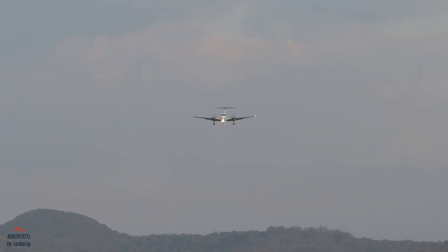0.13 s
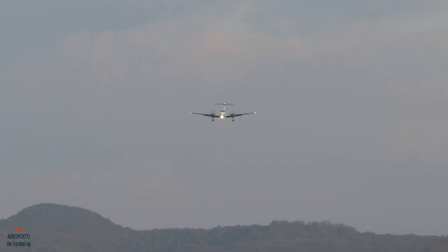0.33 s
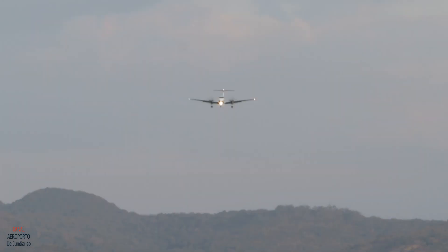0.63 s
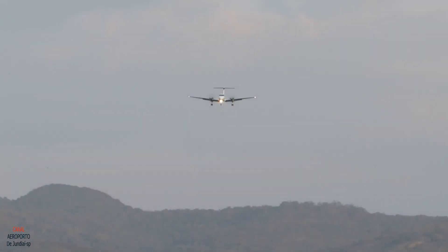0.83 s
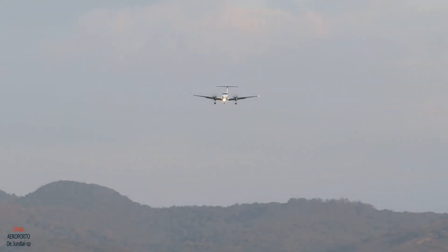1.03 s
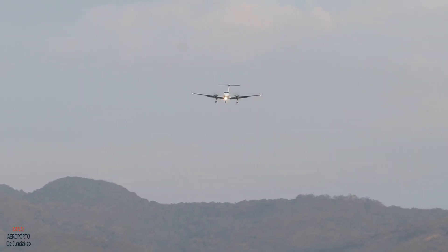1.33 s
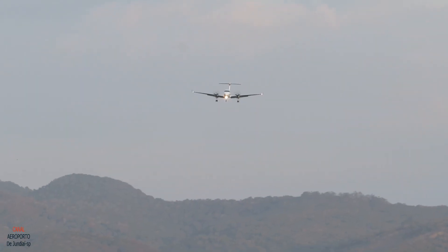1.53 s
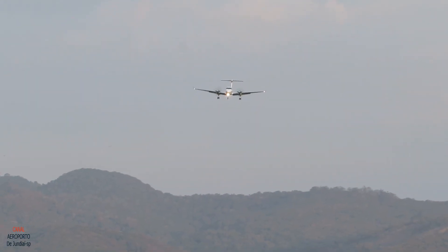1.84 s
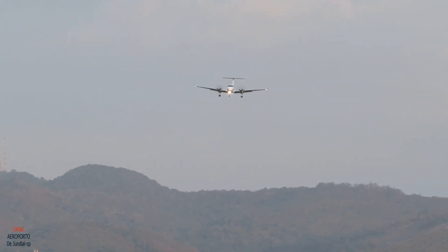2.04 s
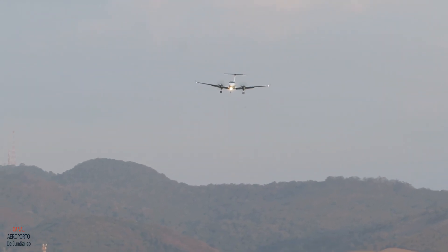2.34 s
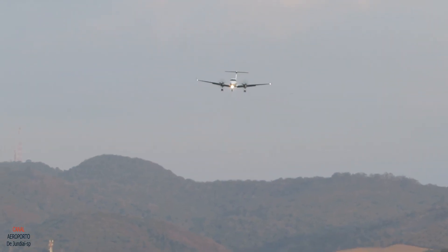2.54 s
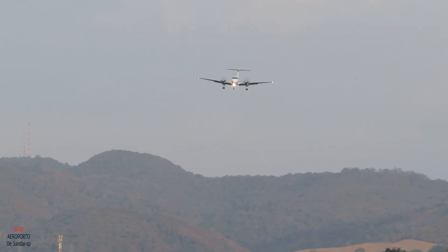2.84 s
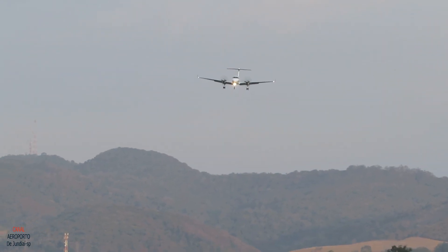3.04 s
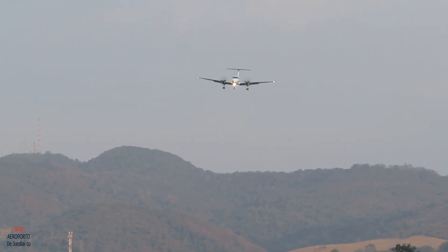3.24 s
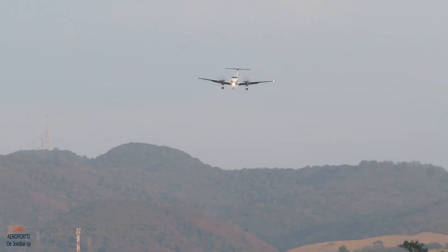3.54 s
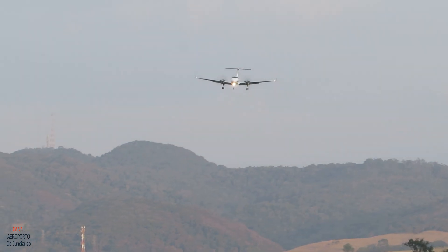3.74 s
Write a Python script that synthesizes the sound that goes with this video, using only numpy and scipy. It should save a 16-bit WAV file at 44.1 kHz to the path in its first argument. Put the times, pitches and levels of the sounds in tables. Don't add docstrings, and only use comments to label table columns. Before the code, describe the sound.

After a tiny silence, a twin turboprop's roar cuts in at about 0.06 s, low, muffled and hollow from ground reflection. It steps up near 1 s and stays continuous to the abrupt end. Low propeller hum and uneven exhaust throbs sit beneath; a steady-pitched turbine whine flutters, strongest around 1.5-2.3 s and leaning left. Faint hiss rises until 1.5 s. Faint bird chirps come at 0.3 and 2.9 s.

```python
import sys
import numpy as np
from scipy import signal
from scipy.fft import rfft, irfft, next_fast_len
from scipy.io import wavfile

SR = 44100
rng = np.random.default_rng(int(sys.argv[2]) if len(sys.argv) > 2 else 0)


def volts_from_db(level):
    exponent = np.asarray(level, float) / 20
    return 10 ** exponent


def to_wav(s):
    ch = np.atleast_2d(s).T
    pcm = np.round(np.clip(ch, -1, 1) * 32767)
    wavfile.write(sys.argv[1], SR, pcm.astype(np.int16))


N = 171549
T = np.arange(N) / SR
FFT_SIZE = 2 * next_fast_len(N // 2 + 1)
FFT_HZ = np.arange(FFT_SIZE // 2 + 1) * SR / FFT_SIZE
SIDES = np.array([[1], [-1]])
START_S = .058


def in_time(rows):
    s, *cols = np.transpose(rows)
    return [np.interp(T, s, c) for c in cols]


def at_hz(points, hz):
    table_hz, value = np.transpose(points)
    return np.interp(np.log(hz + 1), np.log(table_hz), value)


def rms_one(x):
    return x / np.sqrt(np.mean(x ** 2) + 1e-20)


def drift(rate_hz):
    r = np.exp(-80 * np.pi * rate_hz / SR)
    slow = signal.lfilter([1], [1, -2 * r, r * r], rng.standard_normal(N // 40 + 2002))
    slow = rms_one(slow[2000:])
    return np.interp(np.arange(N) / 40, np.arange(len(slow)), slow)


def narrow_noise(hz, width_hz):
    r = np.exp(-np.pi * width_hz / SR)
    x = rng.standard_normal(N + SR)
    for _ in range(2):
        x = signal.lfilter([1, 0, -1], [1, -2 * r * np.cos(2 * np.pi * hz / SR), r * r], x)
    return rms_one(x[SR:])


def swells(rows):
    s, half_s, *dbs = np.transpose(rows)[:, :, None]
    coarse_s = T[::50]
    shape = np.exp(-2 * np.abs((coarse_s - s) / (1.44 * half_s)) ** 4.5)
    levels = [np.sqrt(np.sum(volts_from_db(2 * db) * shape, axis=0)) for db in dbs]
    return np.array([np.interp(T, coarse_s, level) for level in levels])


def patchy(spectra, low_hz, high_hz, patchy_db, count, tilt_db=0):
    octaves = np.log(np.clip(FFT_HZ, low_hz, high_hz) / low_hz)
    place = octaves / np.log(high_hz / low_hz) * (count - 1)
    out, together = 0, drift(14.0)
    for k, hz in enumerate(np.geomspace(low_hz, high_hz, count)):
        share = np.clip(1 - np.abs(place - k), 0, 1)
        flicker = 0.6 * together + 0.81 * drift(1.8) + 0.79 * drift(24.0)
        db = patchy_db * flicker + tilt_db * np.abs(np.log2(max(hz, 120) / 300))
        out = out + volts_from_db(db) * irfft(spectra * share, FFT_SIZE)[:, :N]
    return rms_one(out)


# time in s, level in dB, lift in dB per octave either side of 300 Hz.
ROAR_LEVEL = [(.06, -33, 0.47), (.5, -33, 1), (1.0, -28.5, -0.2), (1.5, -28.5, 1), (2.0, -28, 0.5),
              (2.6, -28, 1.22), (3.3, -27, 1), (3.65, -29, 1.7), (3.8, -25.5, 0.2), (3.89, -30, 3)]
# frequency in Hz, density in dB per Hz.
ROAR_COLOUR = [(22, -19.5), (50, -9.5), (110, -15.5), (330, -2.5), (560, -16), (1000, -23.5), (1600, -29.5),
               (4000, -50.5)]
# frequency in Hz, coherence 0-1.
LIKENESS = [(30, .999), (160, .98), (300, .99), (450, .88), (700, .62), (2000, .8), (3200, .45)]
# frequency in Hz, phase in rad.
LEAD = [(40, -0.23), (200, -0.35), (430, -0.78), (1290, -0.42), (2240, -0.16)]
# frequency in Hz, difference in dB.
TILT = [(60, 0), (160, 1.5), (270, -.3), (440, -1), (730, .5), (2000, 0)]


def roar():
    ground_delay_s, ground_gain, ground_cut_hz = 0.00097, 0.42, 1700
    bank_delay_s, bank_gain, bank_cut_hz = 0.0013, 0.23, 700
    hz = FFT_HZ
    ground = ground_gain / (1 + (hz / ground_cut_hz) ** 2) * np.exp(-2j * np.pi * hz * ground_delay_s)
    bank = bank_gain / (1 + (hz / bank_cut_hz) ** 2) * np.exp(-2j * np.pi * hz * bank_delay_s)
    mid, side = rfft(rng.standard_normal((2, FFT_SIZE)))
    alike = np.clip(at_hz(LIKENESS, hz), 0, 1)
    pair = np.sqrt(1 + alike) * mid + SIDES * np.sqrt(1 - alike) * side
    pair = pair * np.exp(.5j * SIDES * at_hz(LEAD, hz))
    pair = pair * volts_from_db(at_hz(ROAR_COLOUR, hz) + .5 * SIDES * at_hz(TILT, hz))
    pair = pair * (1 + ground - bank) / (1 + (hz / 5000) ** 6)
    level_db, tilt_db = in_time(ROAR_LEVEL)
    return volts_from_db(level_db) * patchy(pair, 60, 1930, patchy_db=0.6, count=12, tilt_db=tilt_db)


# frequency in Hz, width in Hz, level in dB against the roar.
DUCTS = [(327, 34.7, -11), (930, 210, -18.5), (254.3, 43, -13), (1903, 680, -27.5), (409.8, 30, -15.5)]
# time in s, then one level in dB per duct.
DUCT_SWELL = [(.06, 3.5, -10, -1, -3, -11), (.6, -14, 0, -9, -2, 3), (.9, -6.5, -8, -4, 0.5, -6),
              (1.2, 7.5, -1.5, -2, -1, 0.5), (1.7, 5, 1, -6, 0, -1.5), (2.1, -0.5, 1.5, -9, 1, 2.5),
              (2.4, 1.5, 0, -9, 3, 0), (2.7, 3, 4, 4.5, -1, -3), (3.0, -5, -2, 0, 2, 3),
              (3.3, -3, 4, 0, 3, 0.5), (3.55, -3, 2.5, 5, 5, -0.5), (3.89, 6, -1, -3.5, 5.5, 1.5)]


def ducts():
    out = 0
    for (hz, width_hz, db), swell_db in zip(DUCTS, in_time(DUCT_SWELL)):
        mid, side = narrow_noise(hz, width_hz), narrow_noise(hz, width_hz)
        out = out + volts_from_db(db + swell_db + 2.8 * drift(1.7)) * (mid + 0.073 * SIDES * side)
    return volts_from_db(in_time(ROAR_LEVEL)[0]) * out


# time in s, level in dB.
BLADES = [(.06, -47), (.2, -50), (.4, -37.5), (.75, -36), (1.0, -40), (1.4, -42.5), (1.55, -63), (1.7, -40),
          (1.8, -46.5), (2.1, -39.5), (2.45, -35.5), (2.75, -33.5), (3.05, -34), (3.5, -33.5),
          (3.89, -35.5)]


def blade_hum():
    start_hz, sag_hz_per_s, lag_rad = 128.8, .95, 0.11
    second_db, flutter_db, pan_db = -10.5, 1.2, 2
    phase = 2 * np.pi * np.cumsum(start_hz - sag_hz_per_s * T) / SR + 0.58 * drift(4.0)
    tone = np.sin(phase + .5 * SIDES * lag_rad) + volts_from_db(second_db) * np.sin(2 * phase)
    level_db = in_time(BLADES)[0] + flutter_db * drift(8.7) + .5 * SIDES * pan_db
    return np.sqrt(2) * volts_from_db(level_db) * tone


# centre in s, half length in s, level in dB.
THROB = [(.2, 0.036, -33), (.75, 0.55, -36.5), (1.35, 0.24, -34.5), (1.55, 0.076, -35),
         (1.93, 0.054, -30.5), (2.2, 0.13, -34.5), (2.55, 0.11, -33.5), (2.93, 0.06, -31.5),
         (3.3, 0.085, -33.5), (3.6, 0.1, -32), (3.85, 0.059, -34.5)]
# time in s, level in dB.
THROB_TONE = [(.06, -9), (1.9, -9), (2.3, 1), (3.89, 1)]


def exhaust_throb():
    throb_hz, width_hz, wander_hz, noise_db = 70, 30, 1.0, -5
    phase = 2 * np.pi * np.cumsum(throb_hz + wander_hz * drift(2.8)) / SR
    tone = np.sqrt(2) * volts_from_db(in_time(THROB_TONE)[0]) * np.sin(phase)
    return swells(THROB)[0] * (tone + volts_from_db(noise_db) * narrow_noise(throb_hz, width_hz))


# time in s, level in dB.
GAIN = [(.06, -70), (.5, -68), (1.0, -66), (1.45, -64), (3.89, -64.5)]
# frequency in Hz, density in dB per Hz.
HISS_COLOUR = [(500, -11.5), (3000, -0.5), (4500, -3.5), (7500, -2.5), (8300, -6.5), (11500, -10),
               (13800, -18), (15000, -22)]


def hiss():
    pair = rfft(rng.standard_normal((2, FFT_SIZE))) * volts_from_db(at_hz(HISS_COLOUR, FFT_HZ))
    return volts_from_db(in_time(GAIN)[0] + 8) * patchy(pair, 2700, 12000, patchy_db=0.5, count=4)


def pilot_line():
    line_hz, level_db = 13169, -22
    phase = 2 * np.pi * line_hz * T + np.array([[0], [1]])
    return volts_from_db(in_time(GAIN)[0] + level_db) * np.sin(phase)


# centre in s, half length in s, left and right level in dB.
WHINE = [(0.162, 0.15, -42, -45), (0.38, 0.053, -37, -45), (0.524, 0.045, -34.5, -39.5),
         (0.626, 0.027, -39.5, -50), (0.735, 0.05, -38, -43), (0.93, 0.13, -34, -47),
         (1.025, 0.05, -37, -42), (1.095, .025, -42, -42), (1.197, .03, -36, -45),
         (1.325, 0.086, -33.5, -39.5), (1.5, 0.076, -29, -44), (1.655, 0.062, -25.5, -34),
         (1.747, .025, -34, -42), (1.81, 0.035, -40, -42), (1.918, 0.051, -28.5, -36.5),
         (2.042, 0.053, -32.5, -35.5), (2.188, 0.06, -27.5, -32.5), (2.292, .04, -32, -38),
         (2.38, 0.038, -33.5, -43), (2.46, 0.031, -45, -42), (2.571, 0.041, -32.5, -41),
         (2.673, 0.12, -37, -41.5), (2.804, 0.031, -33, -53), (2.917, 0.04, -40, -42.5),
         (3.069, 0.076, -32.5, -35.5), (3.245, 0.032, -29.5, -42), (3.355, 0.068, -37.5, -48),
         (3.484, 0.04, -29, -37), (3.586, 0.049, -32, -32.5), (3.688, 0.033, -40, -37.5),
         (3.8, 0.076, -38, -42.5)]
# centre in s, half length in s, left and right level in dB.
OVERTONE = [(.09, 0.055, -57, -69), (.645, 0.13, -53, -68), (0.974, .035, -64, -62),
            (1.185, 0.065, -59, -70), (1.404, .09, -65, -54.5), (1.648, 0.088, -59.5, -59),
            (1.897, 0.041, -55.5, -67), (1.98, 0.036, -65, -63), (2.144, .06, -57.5, -65),
            (2.35, 0.028, -58, -62), (2.7, 0.13, -51.5, -60), (2.95, .04, -61, -64), (3.1, .03, -56, -63),
            (3.34, 0.076, -53, -60), (3.42, 0.045, -60, -59), (3.65, .05, -57, -61), (3.78, .07, -77, -60)]
# multiple of the whine, level in dB against the overtone.
UPPER = [(3, -17), (4, -24)]
# centre in s, half length in s, left and right depth in dB.
NULLS = [(0.106, 0.014, 13, 5), (.28, .015, 2, 8), (0.452, .015, -2, 1), (.796, 0.016, 8, 8),
         (1.07, 0.014, 16, 0), (1.135, 0.018, 23, 13), (1.22, .012, 5, 17), (1.48, .012, -0.5, 13),
         (1.805, 0.014, 14, 15), (1.906, 0.019, 6, 8), (2.074, .01, 7, 3), (2.442, .009, 17, 11),
         (2.488, .008, 10, 11), (2.512, .012, 16, 16), (2.845, .01, 7, 18), (2.887, .01, 18, -3),
         (3.184, .013, -3, 10), (3.267, 0.012, 1, 14), (3.536, 0.0089, 4, 1)]


def whine():
    whine_hz, wander_rad, flutter_db = 1304.8, .4, .7
    skirt_hz, skirt_db = 50, -20
    shared = wander_rad * drift(4.8)
    nulls = sum(np.outer(dbs, np.exp(-((T - s) / half_s) ** 2)) for s, half_s, *dbs in NULLS)
    out = []
    for sign, level, over, null_db in zip((.5, -.5), swells(WHINE), swells(OVERTONE), nulls):
        steady = 2 * np.pi * whine_hz * T + shared
        phase = steady + wander_rad * drift(1.4) + sign * 0.6
        main = np.sqrt(2) * np.sin(phase) + volts_from_db(skirt_db) * narrow_noise(whine_hz, skirt_hz)
        main = level * volts_from_db(flutter_db * drift(22.0) - null_db) * main
        steady = steady + sign * .5
        upper = np.sin(2 * steady) + sum(volts_from_db(db) * np.sin(k * steady) for k, db in UPPER)
        out.append(main + np.sqrt(2) * over * upper)
    return np.array(out)


# peak in s, rise in s, top in Hz, fall in Hz per s, level in dB.
CHIRPS = [
    (.32, .045, 7350, 14000, -66.5),
    (2.935, .008, 7600, 20000, -60.5),
]
# delay in s, level in dB.
CHIRP_ECHOES = [(.013, -7), (.027, -8), (.043, -8), (.07, -10), (.11, -13)]


def bird():
    climb_hz_per_s, fall_s, edge_s = 11000, .13, .008
    fade_db, pan_db, flutter_db = 7, -5, 4
    out = np.zeros(N)
    for s, rise_s, top_hz, fall_hz_per_s, db in CHIRPS:
        t = np.clip(T - s, -rise_s, fall_s)
        hz = top_hz + np.where(t < 0, climb_hz_per_s * t, -fall_hz_per_s * t)
        edge = np.clip(np.minimum(t + rise_s, fall_s - t) / edge_s, 0, 1)
        level_db = db - fade_db * np.abs(t) / fall_s + flutter_db * drift(45.0)
        out += edge * volts_from_db(level_db) * np.sin(2 * np.pi * np.cumsum(hz) / SR)
    out = out + sum(volts_from_db(db) * np.roll(out, int(s * SR)) for s, db in CHIRP_ECHOES)
    return out * volts_from_db(.5 * SIDES * pan_db)


def scene():
    aircraft = roar() + ducts() + blade_hum() + exhaust_throb() + whine()
    fade_in = np.clip((T - START_S) / .002, 0, 1)
    return (aircraft + hiss() + pilot_line() + bird()) * fade_in


def top_cut(x):
    return signal.sosfilt(signal.butter(12, 15030, fs=SR, output="sos"), x)


# frequency in Hz, width in Hz, depth 0-1.
SEAMS = [(3930, 260, .68), (7920, 110, .85)]


def record(dry):
    keep = 1
    for seam_hz, width_hz, depth in SEAMS:
        keep = keep * (1 - np.clip(depth, 0, 1) * np.exp(-((FFT_HZ - seam_hz) / width_hz * 2) ** 2))
    mix = irfft(rfft(dry, FFT_SIZE) * keep, FFT_SIZE)[:, :N] * (T > START_S)
    return top_cut(mix)


dry = scene()
out = record(dry)
to_wav(out)
```